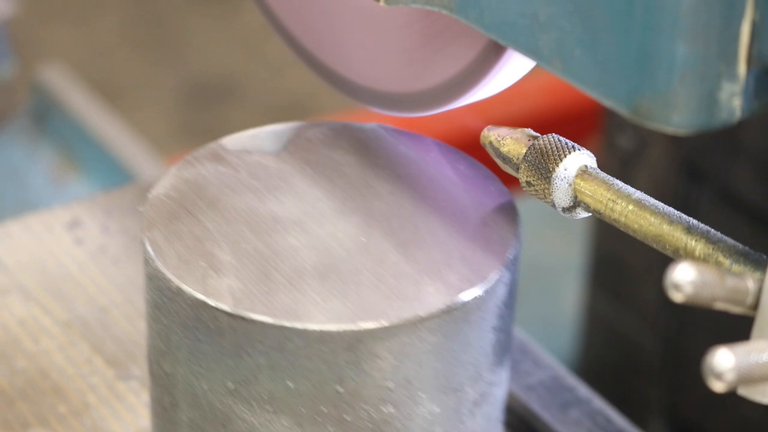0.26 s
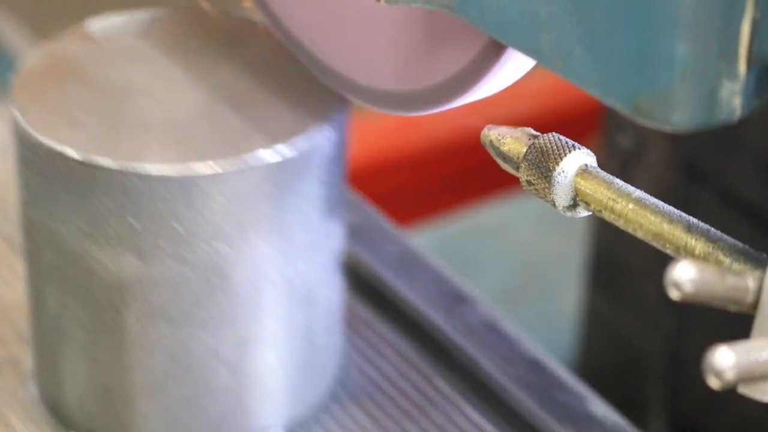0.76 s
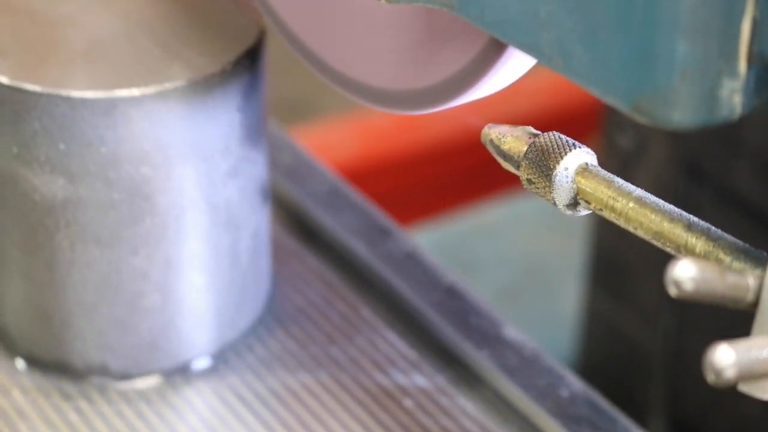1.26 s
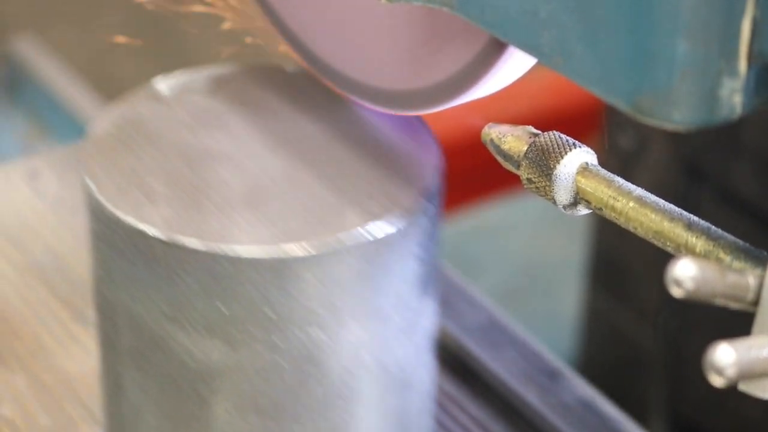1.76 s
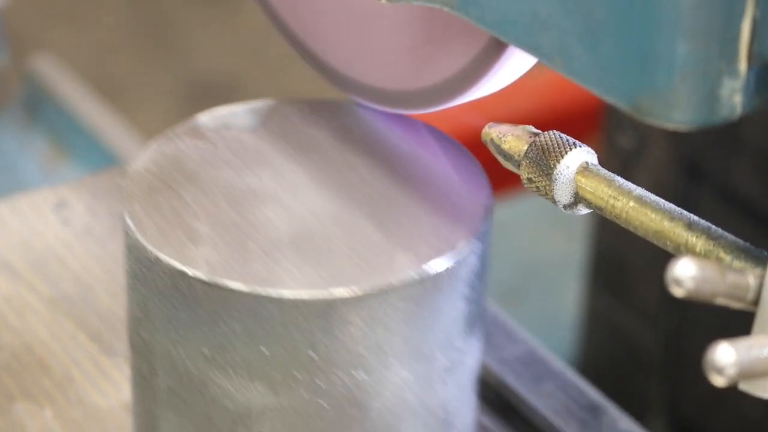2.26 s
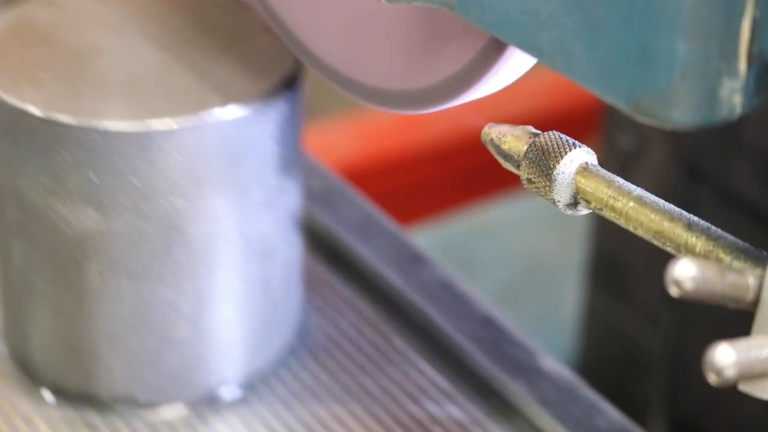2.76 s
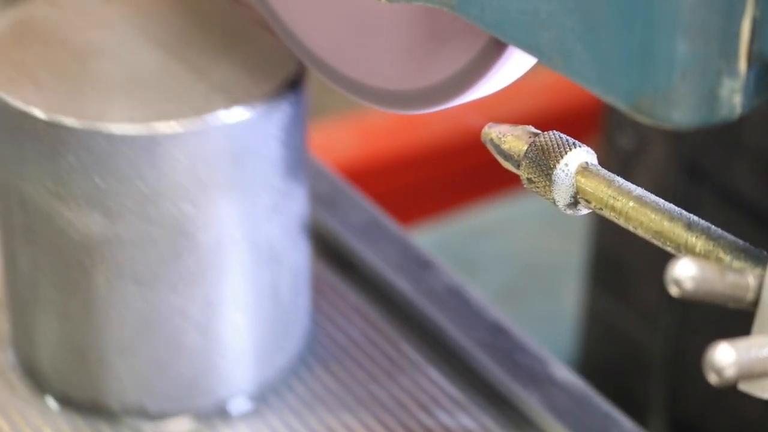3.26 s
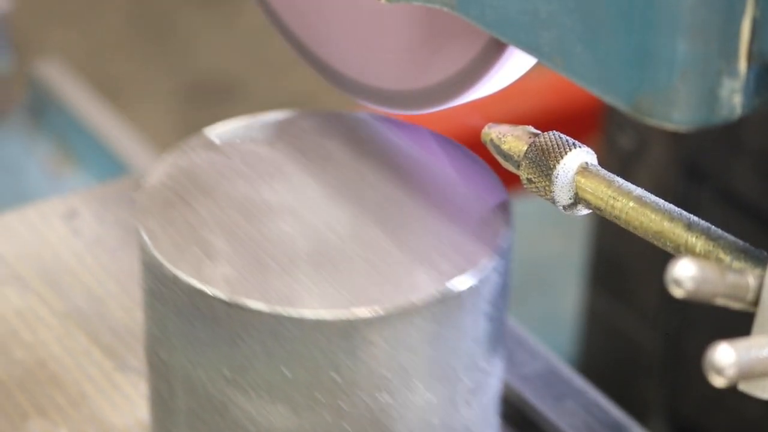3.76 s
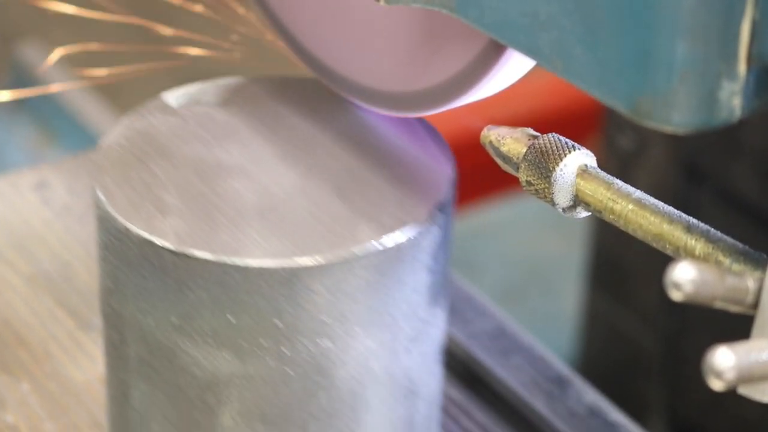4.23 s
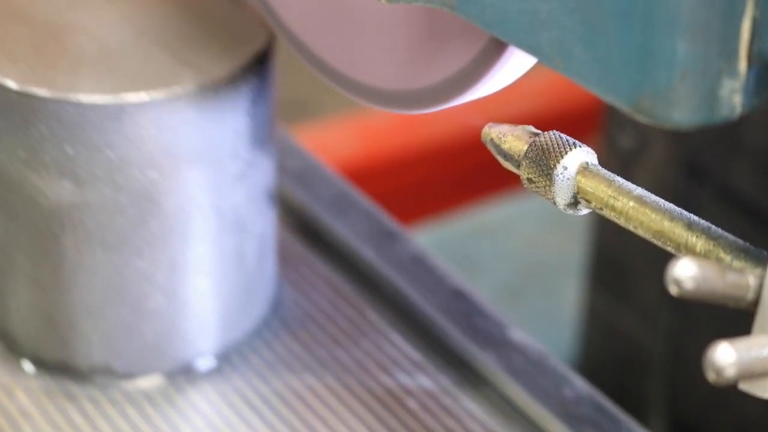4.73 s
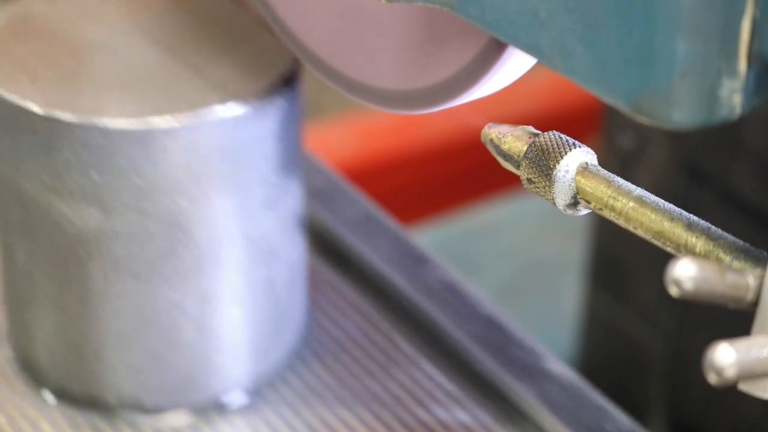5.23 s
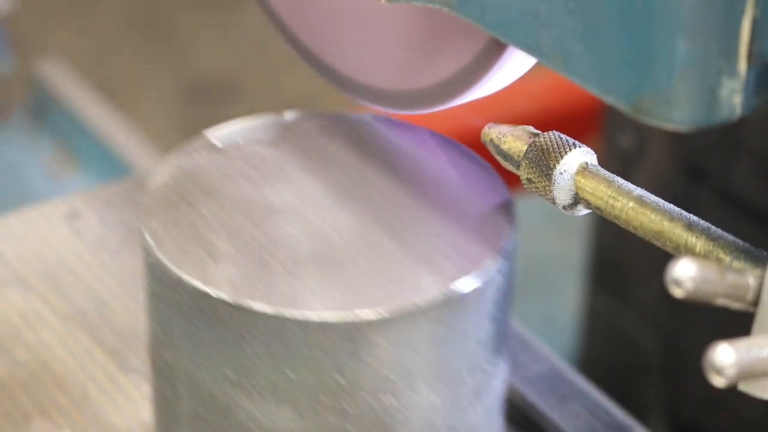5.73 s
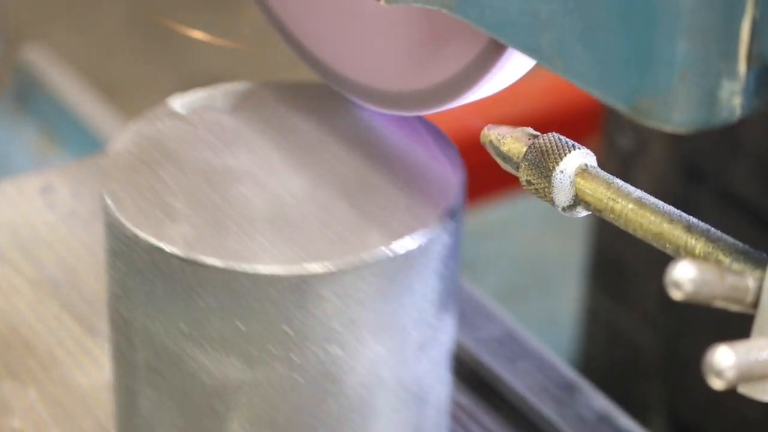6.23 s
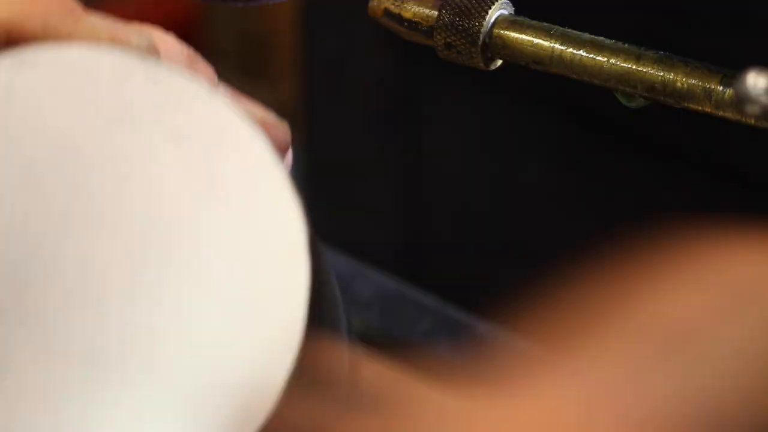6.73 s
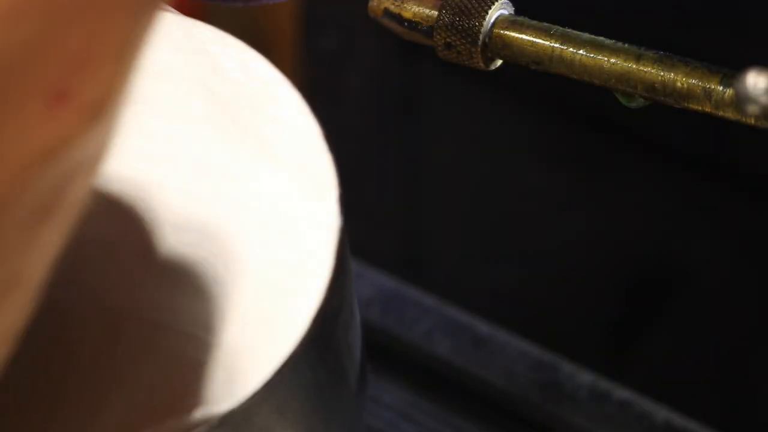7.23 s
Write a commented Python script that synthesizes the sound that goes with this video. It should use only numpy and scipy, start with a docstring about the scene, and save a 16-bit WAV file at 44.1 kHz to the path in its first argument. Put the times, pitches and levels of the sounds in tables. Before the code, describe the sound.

A grinding wheel spins continuously, its bearing singing in clustered, fluttering high tones above a lower growl, airy rush and fine sizzling hiss. A steel bar slides back and forth beneath it, each pass giving a brief harsh scrape, a faint metallic singing and a spray of sparks. The close, dry, nearly mono sound stops in a hard cut to a quiet room with distant motors and a soft finger rub.

```python
"""A bearing whines in throbbing clusters of tones over the rush of a grinding wheel, close to the microphone.
It is a surface grinder that passes the end of a hardened steel bar to and fro; the grit bites and hisses.
The whine is sines at the ball-pass harmonics with cage sidebands; wheel, grit and slides are shaped noise and tones.
The scene cuts abruptly from the running machine to the quiet hum of the workshop and a faint rub of the bar."""
import sys
import numpy as np
from scipy import signal
from scipy.fft import rfft, irfft
from scipy.io import wavfile
from scipy.ndimage import uniform_filter1d

SR = 44100
rng = np.random.default_rng(int(sys.argv[2]) if len(sys.argv) > 2 else 0)


def waveform_to_disk(signal):
    """Save audio, clipped to [-1, 1], as 16-bit WAV at the path in sys.argv[1]."""
    frames = np.transpose(np.atleast_2d(signal))
    scaled = np.clip(frames, -1, 1) * 32767
    samples = np.round(scaled).astype(np.int16)
    wavfile.write(sys.argv[1], SR, samples)


N = 330309
TIME, BINS = np.arange(N) / SR, np.fft.rfftfreq(N, 1 / SR)  # s, Hz

SHAFT_HZ, CAGE_HZ, BALLS = 59.91, 25.9125, 12
CUT_S = 6.638  # the scene cuts from the running machine to the quiet workshop


def amp(db):
    """Decibels to gain."""
    return 10 ** (np.asarray(db) / 20)


def unit(x):
    """Scales to rms 1."""
    return x / np.sqrt(np.mean(abs(x) ** 2) + 1e-20)


def spectrum(points, hz):
    """Reads a spectrum (f/Hz, level/dB) as gain on a log-frequency axis."""
    f, db = np.transpose(points)
    return amp(np.interp(np.log(hz + 1), np.log(f), db))


def curve(rows, axis):
    """Reads one dB column of a time table as gain."""
    rows = np.asarray(rows)
    return amp(np.interp(TIME, rows[:, 0], rows[:, axis]))


def colour(x, points):
    """Filters a signal with a spectrum."""
    return irfft(rfft(x) * spectrum(points, BINS), N)


def white():
    """Unit white noise."""
    return rng.standard_normal(N)


def drift(hz):
    """Random wander of rms 1, rolled off above about hz."""
    return unit(irfft(rfft(white()) / (1 + (BINS / hz) ** 2), N))


def swell(s, half_s):
    """A smooth rise and fall of height 1 around a moment."""
    return np.exp(-.5 * ((TIME - s) / half_s) ** 2)


def plateau(x, half_width):
    """A rounded, flat-topped window of height 1 around x = 0."""
    return np.exp(-.5 * ((x / half_width) ** 2) ** 2)


def tones(rows, clock):
    """Steady sines from rows of (f/Hz, rms level/dB)."""
    out = 0
    for hz, db in rows:
        cycles = hz * clock + rng.random()
        out = out + np.sqrt(2) * amp(db) * np.sin(2 * np.pi * cycles)
    return out


def ringing(modes):
    """Noise that shakes resonances given as rows of (f/Hz, nominal width/Hz, rms level/dB)."""
    response = 0
    for hz, width, db in modes:
        detuning = 2 * (BINS - hz) / (1.35 * width)
        response = response + amp(db) * unit(1 / (1 + detuning ** 2))
    return irfft(rfft(white()) * response, N)


def traverse():
    """Position of the table, easing to a halt at each turning point."""
    # turning points; columns: t/s, position (-1 bar behind the wheel, +1 in front)
    turning_points = [(-.75, -1), (.2, .85), (1.12, -1), (2.1, .95), (3.02, -1), (3.92, 1), (4.93, -1),
                      (5.92, 1), (6.9, -1)]
    s, place = np.transpose(turning_points)
    leg = np.interp(TIME, s, np.arange(len(s)))
    eased = np.floor(leg) + .5 - .5 * np.cos(np.pi * (leg % 1))
    return np.interp(eased, np.arange(len(s)), place)


def cluster(cage, gains, path, scatter, echo):
    """Complex envelope of one harmonic: sidebands beat at the cage rate, and each fades as its echo path changes."""
    cage, path = cage[::32], path[::32]  # the envelope is slow enough for a coarse grid
    sidebands = np.arange(-3, 5)[:, None]
    phase = sidebands * (cage + rng.uniform(0, 2 * np.pi)) + scatter * rng.standard_normal(sidebands.shape)
    echo_cycles = path * rng.uniform(-0.81, 1, sidebands.shape) + rng.random(sidebands.shape)
    reflection = np.exp(2j * np.pi * echo_cycles)
    envelope = gains @ (np.exp(1j * phase) * (1 + echo * reflection)) / np.sqrt(1 + echo ** 2)
    return np.interp(TIME, TIME[::32], envelope)


def whine_levels():
    """The moving bar shades and reflects the whine: rms gain over time of the harmonics that change most."""
    # second harmonic, the growl, before its trim; columns: t/s, level/dB
    growl = [(0.0, -35), (1.16, -38), (1.6, -34.5), (2.87, -33.5), (3.16, -35), (4.56, -32.5), (5.2, -36),
             (5.96, -30.5), (6.6, -34)]
    # third harmonic before its trim; columns: t/s, level/dB
    third = [(0.0, -46.5), (0.39, -36.5), (0.59, -35), (1.05, -39.5), (1.87, -33.5), (2.13, -39),
             (3.1, -35), (3.66, -46.5), (4.74, -48.5), (5.16, -35.5), (5.5, -37.5), (5.7, -43.5),
             (6.25, -33.5), (6.6, -36.5)]
    # fifth harmonic before its trim; columns: t/s, level/dB
    fifth = [(0.0, -43), (0.64, -39), (1.12, -50), (1.38, -41), (3.97, -40.5), (4.23, -35), (5.09, -42),
             (6.6, -42.5)]
    # swells as the bar turns in front of the wheel; columns: t/s, seventh level/dB, sixteenth level/dB
    front_turns = [(0.1, -32.5, -48), (2.2, -36, -44.5), (3.92, -34.5, -52), (5.88, -43, -41.5)]
    lag_s = 0.22  # the sixteenth swells this much after the seventh
    seventh = sum(amp(db) * swell(s, 0.26) for s, db, _ in front_turns)
    sixteenth = sum(amp(db) * swell(s + lag_s, 0.21) for s, _, db in front_turns)
    return {2: amp(0.22) * curve(growl, axis=1),
            3: amp(-0.26) * curve(third, axis=1),
            5: amp(-0.1) * curve(fifth, axis=1),
            7: np.hypot(amp(-41.5), seventh),  # resting level and swell add in power
            16: np.hypot(amp(-53), sixteenth)}


def bearing(clock, place, rough=0.052, rough_hz=45, spread_db=4, sweep_m=0.13):
    """Balls strike a flaw of the inner race; the cage carries them in and out of load, so each harmonic throbs."""
    # ball-pass harmonics 2 to 9, one a row, before echo and levelling; columns: cage sidebands -3 to +4, level/dB
    harmonics = [(-57.7, -63.8, -38.2, -36.8, -45.8, -47.1, -48.5, -55.4),
                 (-67.4, -61.9, -47.1, -39.9, -54.5, -56.4, -62.7, -76.4),
                 (-55.0, -54.6, -51.5, -53.4, -47.7, -63.3, -66.8, -73.6),
                 (-58.1, -56.0, -44.7, -46.5, -46.3, -60.1, -62.6, -73.2),
                 (-59.0, -55.1, -37.2, -58.6, -34.1, -68.6, -51.4, -56.9),
                 (-48.6, -54.3, -41.5, -51.0, -48.6, -55.4, -51.6, -70.9),
                 (-53.5, -63.6, -45.8, -52.3, -49.3, -71.8, -51.3, -66.4),
                 (-63.8, -65.8, -50.1, -65.9, -59.9, -63.4, -61.4, -68.9)]
    # typical upper tone before spread and echo; columns: f/Hz, level/dB
    upper = [(4080, -58), (4490, -72), (4900, -62.5), (5300, -62), (5700, -72.5), (6150, -61),
             (7300, -65.5), (8200, -76), (10000, -78)]
    # loudest pair, either side of the sixth harmonic, before trim; columns: t/s, lower level/dB, upper level/dB
    shrill = [(0.0, -42, -25.5), (0.25, -50, -25.5), (0.6, -47, -35.5), (0.9, -36.5, -41.5),
              (1.55, -33.5, -30.5), (1.75, -40, -37), (1.9, -38.5, -44), (2.4, -28.5, -31),
              (2.85, -32.5, -34), (3.1, -46, -33), (3.5, -40, -30.5), (3.75, -42, -37), (4.05, -51, -34),
              (4.25, -34.5, -34), (5.0, -47, -40.5), (5.15, -43, -35), (5.75, -40, -30.5),
              (6.25, -47, -42.5), (6.6, -43, -36)]
    pass_hz = BALLS * (SHAFT_HZ - CAGE_HZ)
    cage = 2 * np.pi * CAGE_HZ * clock
    flutter = drift(rough_hz) + 1j * drift(rough_hz)
    levels = whine_levels()
    out = np.zeros(N)
    for k in range(2, 25):
        if k - 2 < len(harmonics):
            gains = amp(harmonics[k - 2])
        else:  # higher up the odd sidebands lead, which doubles the throb
            even = np.arange(8) % 2  # marks sidebands -2, 0, +2, +4
            gains = spectrum(upper, k * pass_hz) * amp(spread_db * rng.standard_normal(size=8) - 11.6 * even)
        pair = 0
        if k == 6:  # the loudest pair swells tone by tone: steady when one leads, fluttering when they match
            gains = gains * (abs(np.arange(-3, 5)) != 1)
            lower_tone = curve(shrill, axis=1) * np.exp(-1j * cage)
            upper_tone = curve(shrill, axis=2) * np.exp(1j * cage)
            pair = amp(-0.12) * (lower_tone + upper_tone)
        path = place * sweep_m * k * pass_hz / 343  # in wavelengths
        echo = np.interp(k, (3, 9), (.3, .6))  # short waves reflect better off the bar
        scatter = np.interp(k, (8, 14), (1.2, .4))  # the top harmonics pulse most sharply
        envelope = pair + cluster(cage, gains, path, scatter, echo)
        envelope = envelope * (1 + rough * np.roll(flutter, rng.integers(N)))
        if k in levels:  # level over two cage turns, which keeps the throb
            power = uniform_filter1d(abs(envelope) ** 2, round(2 * SR / CAGE_HZ))
            envelope = envelope / np.sqrt(power) * levels[k]
        out += np.sqrt(2) * (envelope * np.exp(2j * np.pi * k * pass_hz * clock)).real
    return out


def wheel(clock, place, swing_db=1.0):
    """The spinning wheel hums, shakes its guard and drags air along; rush and guard are louder with the bar in front."""
    # spindle hum; columns: shaft order, rms level/dB
    hum_orders = [(1, -68), (3, -74), (4, -77), (5, -72.5), (6, -68.5), (7, -50), (11, -56), (14, -65)]
    # stray tones of the spindle; columns: f/Hz, rms level/dB
    stray = [(2593.4, -47), (3499, -56)]
    # rush of the free-running wheel, bar midway; columns: f/Hz, level/dB per Hz
    rush_colour = [(20, -103), (60, -91), (110, -86), (250, -84), (450, -79), (620, -76), (900, -67.5),
                   (1060, -78), (1450, -73.5), (2250, -72), (2500, -71), (3250, -68.5), (3700, -78.5),
                   (5500, -84.5), (15000, -98)]
    # resonances of guard and table before the guard gain; columns: f/Hz, nominal width/Hz, level/dB
    guard_modes = [(229.5, 25, -63.5), (648, 19, -50), (672.7, 2.7, -43.5), (688, 4, -51), (805, 24, -61.5)]
    hum = tones([(round(order) * SHAFT_HZ, db) for order, db in hum_orders] + list(stray), clock)
    rush = colour(white(), rush_colour) * np.sqrt(SR / 2) * amp(swing_db * place)
    guard_db = -2.5 + 0.5 * clock + 0.6 * place  # rings a little more as time goes on
    return hum + rush + amp(guard_db) * ringing(guard_modes)


def drone(clock, place):
    """Slowly beating hum of the motor, the groan of the table slides and a wavering ring above it."""
    # groans of the slides; columns: t/s, half length/s, added level/dB
    groans = [(1.45, 0.1, -57), (3.33, 0.1, -57), (4.1, .05, -55), (4.597, 0.054, -59), (5.225, 0.073, -50),
              (5.464, 0.055, -48)]
    # wavering ring at the start, bar midway; columns: f/Hz, nominal width/Hz, level/dB
    ring_modes = [(577, 7.5, -68.5), (615, 5.1, -61.5)]
    mains_hz, beat_null_s = 120, 3.1
    turn = 2 * np.pi * (TIME - beat_null_s)
    mains = amp(-70.5) * np.sin(mains_hz * turn)
    second_order = amp(-67.5) * np.sin(2 * SHAFT_HZ * turn)  # opposes the mains hum at the null
    hum = np.sqrt(2) * (mains - second_order)
    drag = amp(-64) + sum(amp(db) * swell(s, length) for s, length, db in groans)
    groan = drag * ringing([(298.4, 20, 0)])
    ring_db = 1.87 * clock + 2.5 * place  # grows with time, louder with the bar in front
    return hum + groan + amp(ring_db) * ringing(ring_modes)


def grit(clock, grains_per_s, size_db, runout):
    """Dense scratches of uneven size; the wheel's high spot cuts harder once a turn."""
    sizes = amp(size_db * np.minimum(rng.exponential(1, N), 5))
    scratches = white() * sizes * (rng.random(N) < grains_per_s / SR)
    high_spot = np.exp(2 * (np.cos(2 * np.pi * SHAFT_HZ * clock) - 1))
    return scratches * (1 + runout * high_spot)


def grinding(clock, place):
    """Grit bites the bar, makes it sing, throws sparks and hisses; the bar shades the hiss as it moves."""
    # the wheel bites on each pass; columns: t/s, half length/s, bite peak level/dB, spark contact level/dB
    cuts = [(0.775, 0.046, -34.5, -50), (1.642, .085, -36.5, -42.5), (2.65, 0.071, -35, -48),
            (3.498, 0.064, -36, -43.5), (4.535, 0.066, -34.5, -42.5), (5.46, 0.066, -35.5, -46),
            (6.595, .11, -38, -44)]
    # colour of the bite before scaling; columns: f/Hz, level/dB
    bite_colour = [(150, -26), (450, -9), (720, 0), (1050, -11), (1450, 1), (2200, 3), (3100, 1.5),
                   (3900, -22), (6000, -27), (15000, -40)]
    # colour of the spark spray before scaling; columns: f/Hz, level/dB
    spray_colour = [(1500, -23), (3200, -7), (3900, 2.5), (4250, -4), (4450, 0), (4900, -1), (5400, -9.5),
                    (7000, -12.5), (12000, -14)]
    # colour of the fine hiss before scaling; columns: f/Hz, level/dB
    hiss_colour = [(3500, -19), (5500, -1.5), (6200, 5.5), (7400, 3), (8500, 2), (9700, 2), (10600, 2),
                   (11200, 7), (11800, 2.5), (13500, 1.5), (15000, -1), (15600, -0.5)]
    # change of the hiss with the bar in front, before scaling; columns: f/Hz, change/dB
    shadow = [(5000, 5), (6500, 2), (7500, 1), (9000, -0.5), (10000, 3.5), (10650, -5), (11200, -1.5),
              (12500, 1), (13500, -1), (14300, -2), (15000, -2), (15600, -2.5)]
    # the same grains strike on every turn, so the bar sings; columns: shaft order, level/dB before sing gain
    sing_orders = [(72, -5), (73, -4), (74, 0), (78, -9), (79, -4), (80, -7)]
    depth = sum(amp(db) * swell(s, length) for s, length, db, _ in cuts)
    bite = depth * unit(colour(grit(clock, grains_per_s=7000, size_db=3.0, runout=0.23), bite_colour))

    # sparks fly while the bar's face is under the wheel; position in half strokes
    face_centre, face_half_width = 0.18, 0.46
    contact = plateau(place - face_centre, face_half_width) * curve(cuts, axis=3)
    sing = amp(-7.5) * contact * tones([(order * SHAFT_HZ, db) for order, db in sing_orders], clock)
    sparks = np.hypot(contact, amp(-8) * depth)
    spray_grit = grit(clock, grains_per_s=12000, size_db=-1.5, runout=0.16)
    spray = np.hypot(amp(-45), sparks) * unit(colour(spray_grit, spray_colour))

    # the fine hiss holds up around each cut and dips briefly at the deepest bite
    hiss_db = -41.5
    for s, length, _, _ in cuts:
        hiss_db = hiss_db + 2.8 * plateau(TIME - s, 0.18) - 1.6 * swell(s, length)
    fine = colour(grit(clock, grains_per_s=36000, size_db=2.2, runout=.18), hiss_colour)
    front = np.clip(place, 0, 1)
    hiss = amp(hiss_db) * unit((1 - front) * fine + front * colour(fine, shadow))
    return bite + sing + spray + hiss


def workshop():
    """Quiet air and the hum of distant motors."""
    # colour of the air before scaling; columns: f/Hz, level/dB
    air_colour = [(25, -23), (60, -15), (110, -4), (200, -1), (250, 2), (420, -4), (1020, -1), (1400, -7),
                  (2500, -9.5), (3300, -6), (4200, -12.5), (15500, -14.5)]
    # distant motor tones; columns: f/Hz, rms level/dB
    motor_tones = [(59.9, -70), (119.8, -74.5), (254.6, -72.5), (318.5, -72), (577, -69), (764, -78),
                   (955, -76), (1082, -70), (1152, -73), (1842, -72), (2304, -65.5)]
    air = amp(-59.5) * unit(colour(white(), air_colour))
    return air + tones(motor_tones, TIME)


def handling():
    """Fingers rub faintly on the steel, a short noise swell through each resonance."""
    # rubs as the bar is turned in the hand; columns: t/s, half length/s, f/Hz, nominal width/Hz, level/dB
    rubs = [(7.36, .04, 340, 90, -66), (7.36, .035, 1050, 130, -60), (7.45, .04, 3120, 170, -65)]
    return sum(swell(s, length) * ringing([(hz, width, db)]) for s, length, hz, width, db in rubs)


def scene():
    """Machine and room reach both channels alike; only the finest hiss and a faint rumble differ."""
    clock = TIME + 0.000146 * np.cumsum(drift(1.5)) / SR  # the spindle speed wavers very slightly
    place = traverse()
    before_cut = np.clip((CUT_S - TIME) / .004 + .5, 0, 1)  # 4 ms crossfade from machine to workshop
    machine = bearing(clock, place) + wheel(clock, place) + drone(clock, place) + grinding(clock, place)
    mid = machine * before_cut + workshop() * (1 - before_cut) + handling()
    hiss = colour(white(), [(3000, -30), (5000, -7), (7500, 0), (15000, -1)])
    rumble = colour(white(), [(25, 0), (130, 0), (500, -12), (2000, -28), (15000, -36)])
    side = amp(-68) * unit(hiss) * before_cut + amp(-76) * unit(rumble)
    return np.array([mid + side, mid - side])


def record(dry):
    """The microphone's bass roll-off and the recorder's steep band limit."""
    thin = signal.sosfilt(signal.butter(2, 36, "high", fs=SR, output="sos"), dry)
    band_limit = signal.firwin(801, 15800, window=("kaiser", 9), fs=SR)
    return signal.oaconvolve(thin, band_limit[None], "same")


dry = scene()
out = record(dry)
waveform_to_disk(out)
```